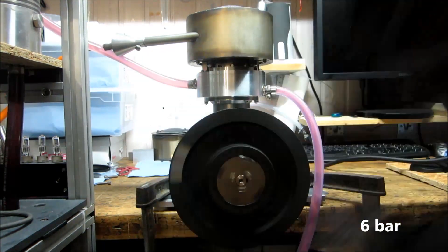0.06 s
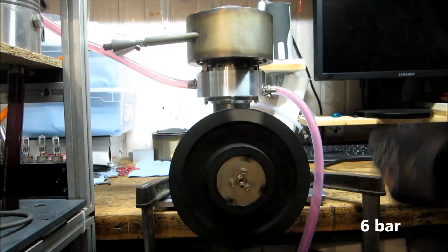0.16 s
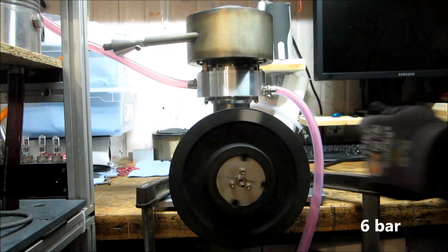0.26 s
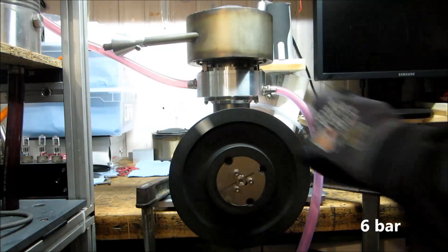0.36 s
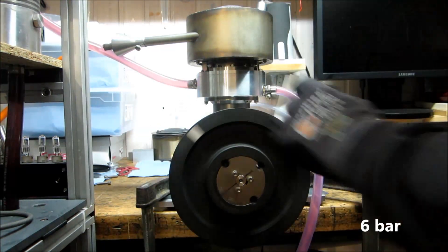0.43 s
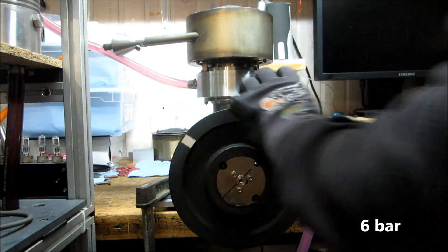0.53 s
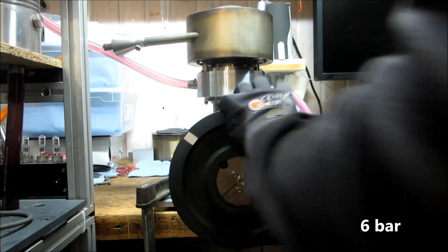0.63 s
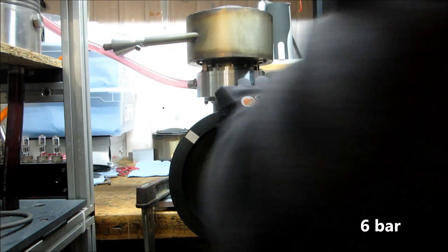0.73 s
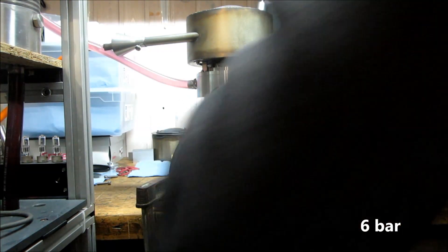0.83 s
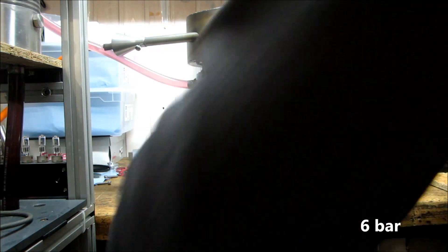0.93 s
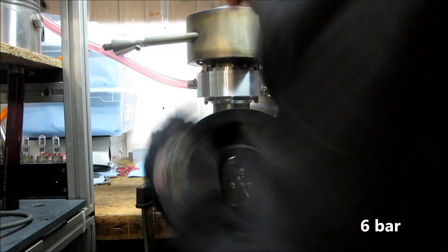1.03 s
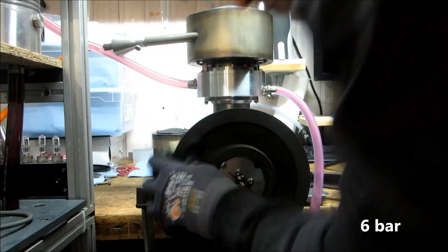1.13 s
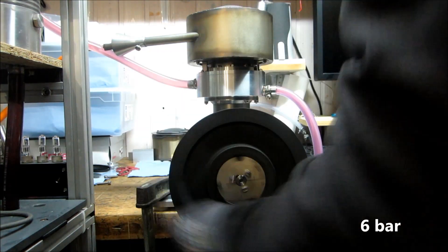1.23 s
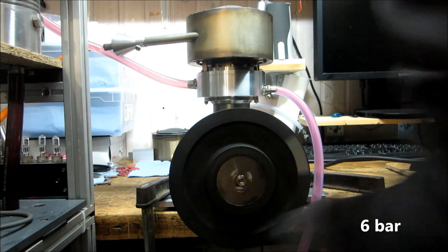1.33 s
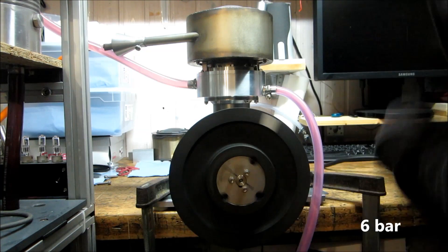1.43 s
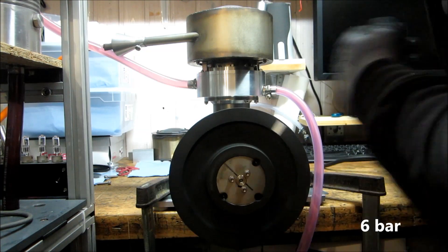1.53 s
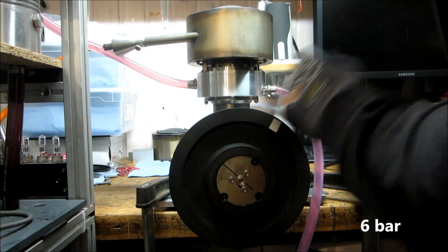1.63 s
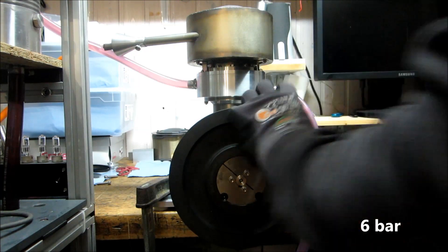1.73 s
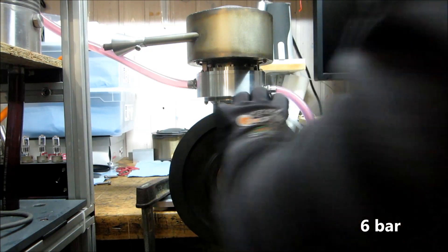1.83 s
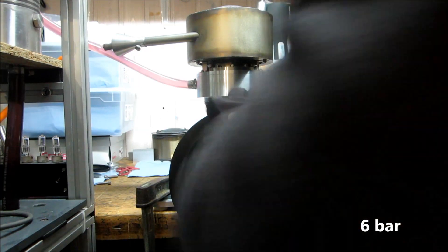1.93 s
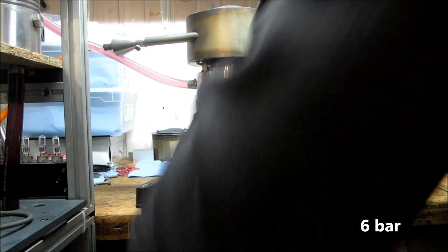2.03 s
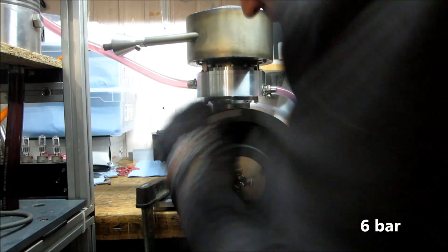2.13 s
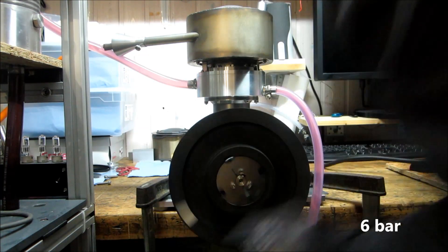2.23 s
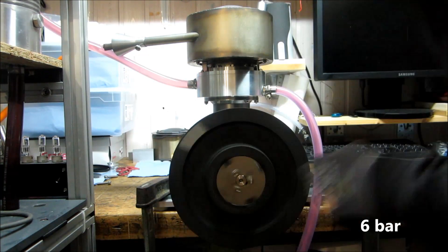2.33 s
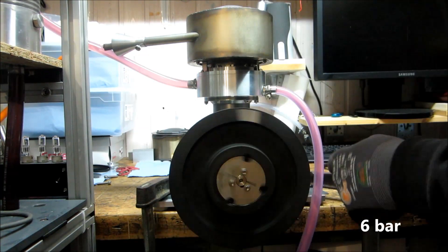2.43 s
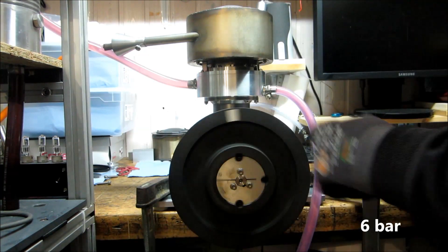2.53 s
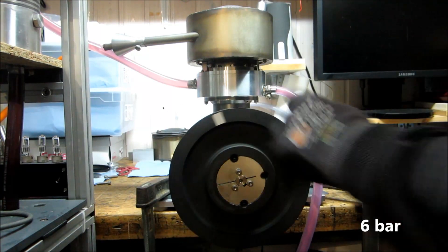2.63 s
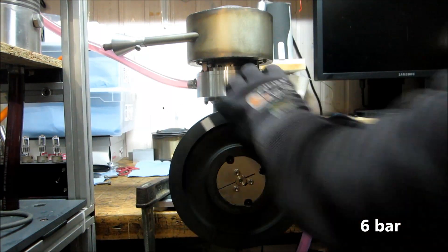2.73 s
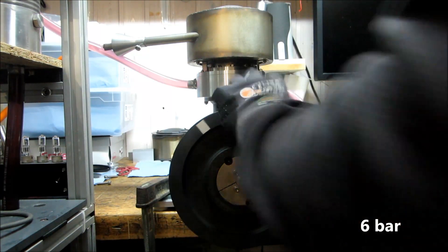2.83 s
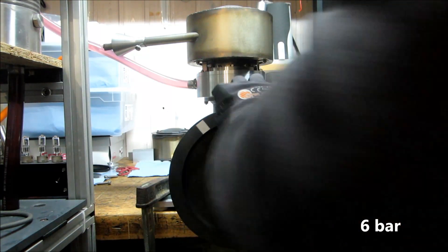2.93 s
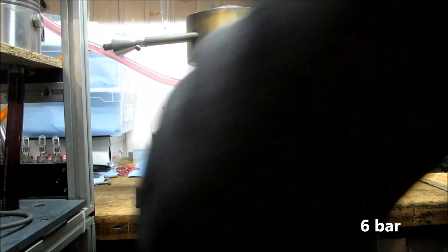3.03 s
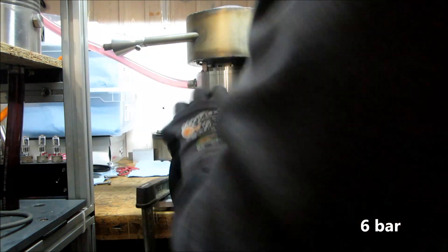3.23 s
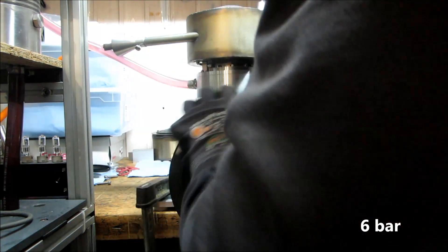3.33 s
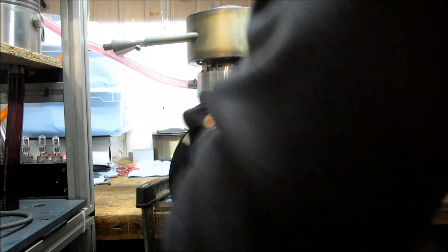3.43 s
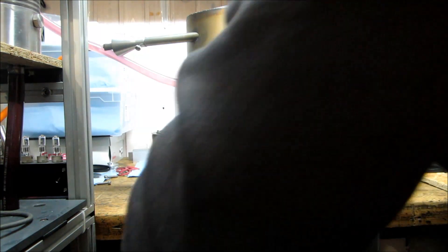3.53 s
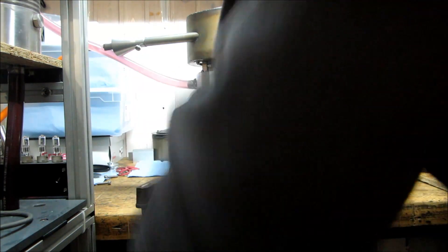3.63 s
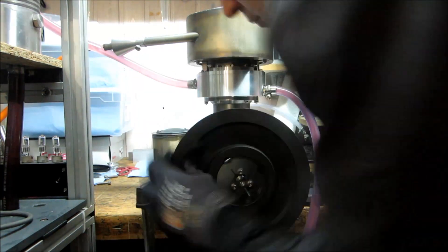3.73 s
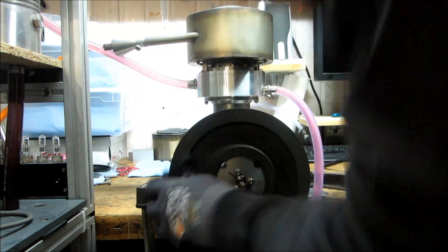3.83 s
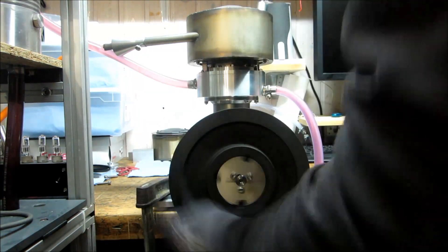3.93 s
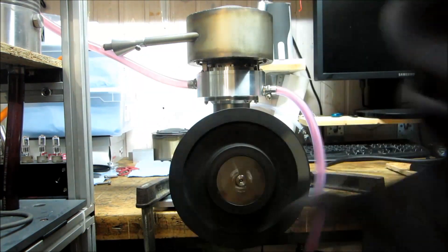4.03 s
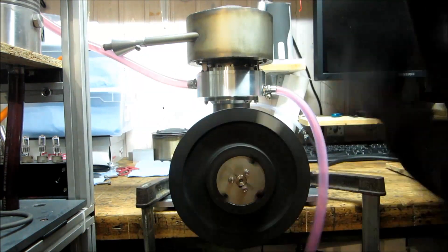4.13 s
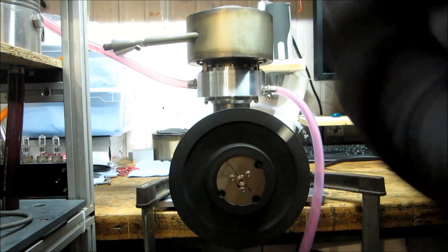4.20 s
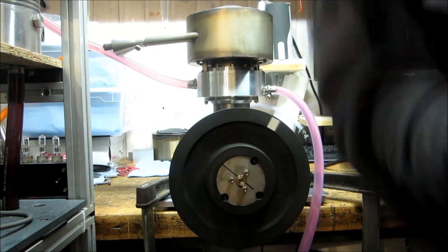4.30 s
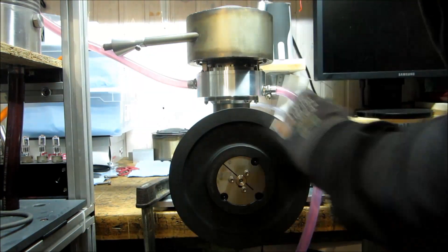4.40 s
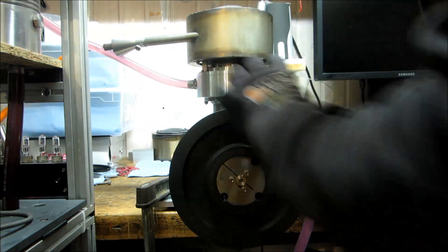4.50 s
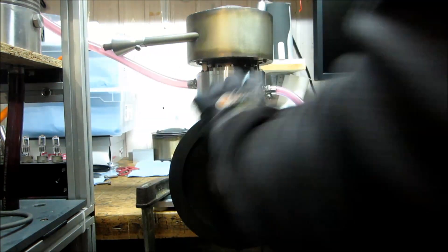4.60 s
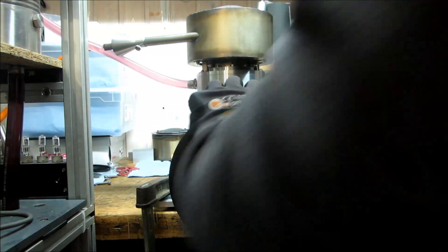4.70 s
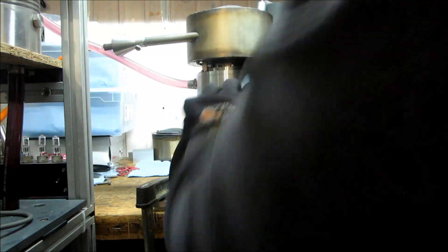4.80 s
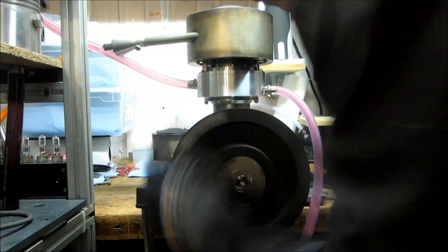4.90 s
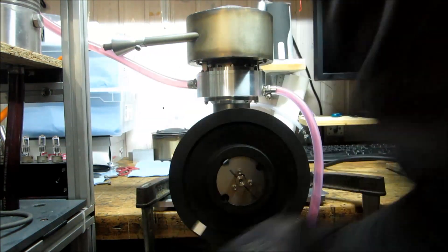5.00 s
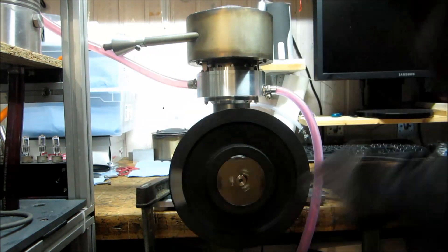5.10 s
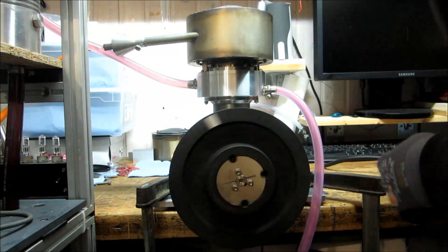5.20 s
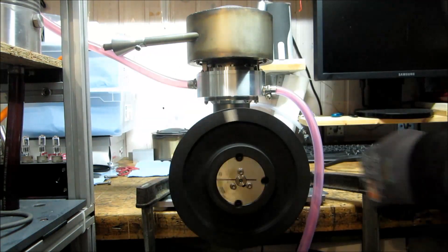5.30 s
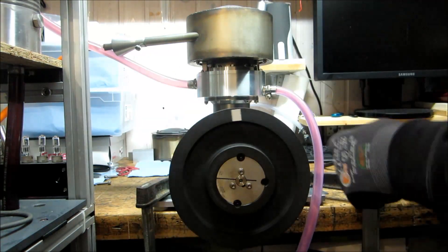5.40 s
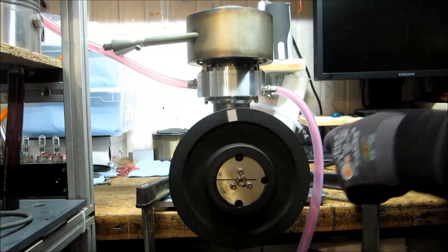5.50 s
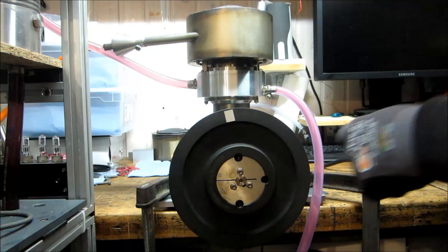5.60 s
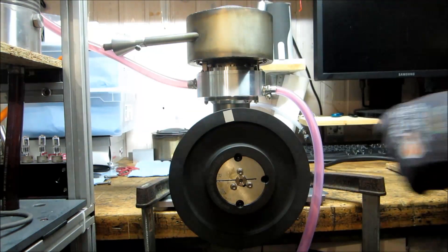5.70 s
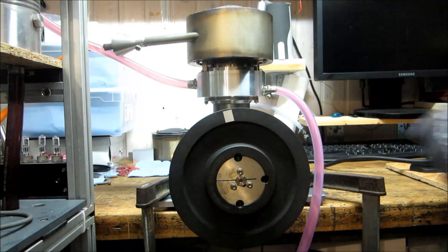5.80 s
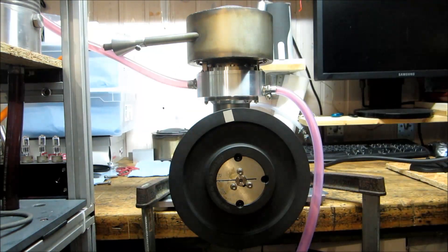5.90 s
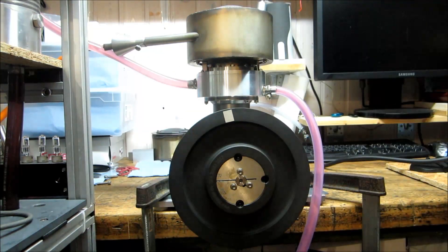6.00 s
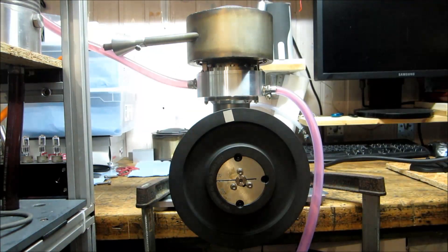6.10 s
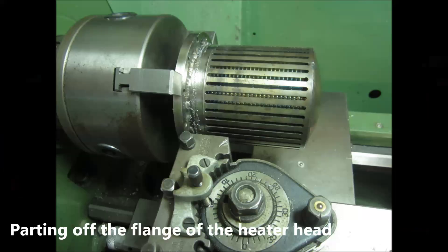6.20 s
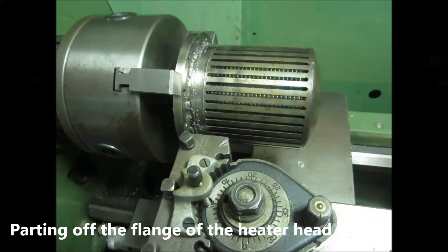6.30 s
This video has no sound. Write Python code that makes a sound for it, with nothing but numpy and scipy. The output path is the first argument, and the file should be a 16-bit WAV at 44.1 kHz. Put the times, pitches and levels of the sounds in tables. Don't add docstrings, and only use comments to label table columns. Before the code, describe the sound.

In a small, quiet workshop, a gloved hand repeatedly jerks the flywheel of a small engine on a wooden bench. Each pull brings uneven metallic clunks, linkage ticks, hollow wooden thumps and a brief rumbling whirr with leaking hiss. Between pulls come faint rubber squeaks and sleeve swishes. The knocking stops, quiet room tone remains, then it cuts to silence and a small click. Close single microphone, weak bass, short room echo.

```python
import sys
import numpy as np
from scipy import signal
from scipy.fft import rfft, irfft, next_fast_len
from scipy.io import wavfile
from scipy.ndimage import uniform_filter1d

SR = 44100
rng = np.random.default_rng(int(sys.argv[2]) if len(sys.argv) > 2 else 0)


def persist_wave(psi):
    counts = np.round(np.clip(psi, -1, 1) * 32767).astype(np.int16)
    wavfile.write(sys.argv[1], SR, np.atleast_2d(counts).T)


def undo_db(level):
    steps = np.asarray(level, float) / 20
    return 10 ** steps


N = 280015
T = np.arange(N) / SR
M = next_fast_len(N)
HZ = np.fft.rfftfreq(M, 1 / SR)

# t/s, force/dB, sharpness/dB, contact length/s
CLUNKS = [(0.0511, -31.5, -2, 0.0077), (0.138, -37, 4, 0.0078), (0.162, -37.5, 9, 0.0022),
          (0.202, -35.5, 0.5, 0.0054), (0.299, -47.5, -1, 0.0059), (1.084, -30, -6.5, 0.0065),
          (1.208, -53, 5.5, 0.0049), (1.326, -50.5, 11.5, 0.0084), (1.321, -48.5, -6, 0.005),
          (1.381, -47, 3.5, 0.0099), (1.397, -32, 5, 0.0049), (1.477, -40.5, 1.5, 0.007),
          (2.446, -43.5, -6, 0.0094), (3.754, -33.5, -5, 0.0073), (4.103, -31.5, 2, 0.0081),
          (4.182, -39.5, 1, 0.0034), (4.289, -45.5, -6, 0.0058), (4.985, -38, 7, 0.0087),
          (5.129, -46, -10, 0.011), (5.135, -42, 5, 0.01), (5.345, -51, -14, 0.006),
          (5.429, -54, -30, 0.0031), (4.758, -61.5, -17, 0.0048)]
# t/s, force/dB, sharpness/dB, contact length/s
SLAPS = [(0.016, -40, 0, 0.0066), (2.19, -44.5, -9, 0.0065), (2.21, -33.5, -2, 0.0057),
         (2.241, -26, -5.5, 0.0035), (2.327, -41.5, -4, 0.013), (2.353, -37.5, -2.5, 0.0085),
         (4.1335, -42, 24, 0.0016), (5.0178, -33.5, -2.5, 0.0072), (5.076, -46.5, 11.5, 0.0097),
         (5.151, -39.5, -2.5, 0.012), (2.162, -53, 2, 0.0074), (3.023, -65, 7, 0.014),
         (3.388, -60.5, 5, 0.0075), (4.966, -47, -9, 0.018)]
# t/s, force/dB, sharpness/dB, contact length/s
SCUFFS = [(0.108, -44.5, -4, 0.022), (1.007, -60.5, 4, 0.0056), (1.15, -50, -8, 0.012),
          (1.255, -53.5, -4, 0.015), (2.093, -56.5, -12, 0.011), (2.118, -55.5, -1, 0.012),
          (2.625, -49, -18, 0.002), (3.662, -61.5, -3.5, 0.012), (3.696, -51.5, 2, 0.013),
          (3.812, -50, -6, 0.011), (3.885, -53.5, -5, 0.016), (4.024, -62, -5, 0.033),
          (4.428, -67, 7, 0.0093), (4.875, -60, -12, 0.0059), (4.926, -55.5, -13, 0.0065),
          (4.938, -52, 4, 0.0092), (4.969, -51, -17, 0.0065), (3.173, -63.5, -7, 0.0048)]
# t/s, force/dB, sharpness/dB
TICKS = [(.002, -49, -20), (.080, -46.5, 20), (.296, -41, -2), (4.649, -59.5, 8), (1.258, -60, 22),
         (.196, -39.5, -16), (0.434, -49, -21), (0.869, -59.5, 30), (1.026, -48, 6), (1.345, -44.5, 15),
         (1.582, -46, -18), (2.2865, -38, 12), (2.296, -41.5, 22), (2.431, -41.5, -15), (2.545, -42, -7),
         (2.448, -44, -4), (2.984, -55.5, 14), (3.172, -56, -8), (3.696, -60.5, 18), (3.647, -51, -9),
         (4.183, -37.5, -7), (4.826, -58.5, -12)]
# share/dB, slope/(dB per dB of sharpness)
HEAVY_PATH = [(-0.5, 0), (-6, 0.23), (-4.5, 0.69), (-12.5, 1)]
PIN_PATH = [(-2, 0.22), (-2.5, 0), (-1.5, 0.37), (-10, 0.73)]
LIGHT_PATH = [(-9.5, -0.27), (-14.5, -0.065), (-0.5, -0.12), (-13, 0.43)]
# f/Hz, width/Hz, level/dB
FRAME = [(796, 140, -5), (873, 60, -5), (1010, 150, -3.5), (1192, 110, -1.5), (1308, 73, -2),
         (1343.6, 69, -1.5), (1491, 100, -7.5), (1692, 230, -10), (1875.6, 56.6, -1), (1889, 163, 0),
         (2190, 237, -5), (2328, 223, -5.5), (2723, 183, -10.5)]
# f/Hz, width/Hz, level/dB
LINKAGE = [(3120, 820, 0.5), (3570, 95, -4.5), (3780, 373, 2), (4030, 710, 3), (4660, 310, -6),
           (5270, 740, -8)]
# f/Hz, level/(dB per Hz)
EDGE = [(2350, -14), (4000, 5.5), (4940, -7), (6400, -1.5), (8800, -3), (11800, -7), (13200, -12.5),
        (15600, -18.5)]
# t/s, peak level/dB, f/Hz
CRACKS = [
    (.0585, -26, 2200),
    (4.1343, -21.5, 5500),
    (5.0245, -25, 2800),
    (2.2487, -28, 2200),
]
# t/s, level/dB, f/Hz
PINGS = [(0.058, -24, 1420), (0.137, -29, 1770), (0.205, -31, 1190), (0.297, -40, 1480), (0.435, -44, 3630),
         (1.085, -29, 1260), (1.4, -28, 1190), (1.482, -36, 1200), (1.586, -40, 1010), (2.165, -45.5, 1960),
         (2.211, -28.5, 1840), (2.244, -25, 2370), (2.333, -32, 1480), (2.355, -29, 1810),
         (2.432, -34, 980), (2.546, -38, 3160), (3.648, -51, 4480), (3.756, -27, 1186), (3.889, -46, 1930),
         (4.106, -23.5, 1187), (4.183, -33, 1190), (4.291, -40, 1190), (4.83, -55, 3810), (4.929, -44, 829),
         (4.986, -29.5, 1900), (5.022, -24, 1187), (5.132, -32, 1260), (5.157, -31, 1490),
         (5.348, -46, 1200)]
# t/s, level/dB, f/Hz
MORE_PINGS = [(0.32, -38, 4000), (.196, -36, 4100), (4.184, -31, 3900), (5.133, -34, 4000),
              (4.291, -40, 1190), (1.482, -33, 1190), (1.402, -27, 1190), (1.085, -29, 1270),
              (5.347, -47, 1900), (2.212, -32, 1840), (5.432, -51, 1490)]

# t/s, top board level/dB, small boards and clamps level/dB
THUMPS = [(.022, -36.5, -37.5), (0.063, -35, -50), (0.107, -43, -57), (.138, -59, -41),
          (.164, -43.5, -48.5), (0.205, -41, -52), (.302, -38.5, -40), (1.101, -43.5, -41),
          (1.327, -72, -47.5), (1.405, -32, -41), (1.495, -34, -39), (1.585, -43, -47), (2.096, -60, -46.5),
          (2.212, -32.5, -36.5), (2.245, -43, -39), (2.331, -41, -57), (2.359, -55, -41), (2.445, -41, -48),
          (2.548, -41.5, -42.5), (3.41, -57.5, -51), (3.665, -49, -51.5), (3.763, -44.5, -41),
          (4.108, -32, -39), (4.193, -34, -39), (4.296, -44.5, -48.5), (4.986, -31.5, -39),
          (5.024, -40.5, -40.5), (5.138, -43.5, -43), (5.162, -61, -41), (5.196, -42.5, -50)]
# t/s, level/dB
LURCHES = [
    (.162, -34.5),
    (2.36, -38),
    (2.387, -44.5),
    (3.94, -53.5),
    (5.158, -39),
    (5.195, -41),
]
# f/Hz, width/Hz, level/dB
BOARD = [(173, 24, 0), (200, 20, .3), (235, 35, -13)]
# f/Hz, width/Hz, level/dB
BENCH = [(270, 45, 0), (341.7, 45, 0.4), (385, 45, -8), (423, 30, -1), (471, 55, -3), (519, 28, -2),
         (551, 35, 0), (630, 80, -4), (726, 110, -5), (860, 150, -8)]
# f/Hz, width/Hz, level/dB
PLANKS = [(225, 50, -2), (285, 50, 0), (345, 50, 0), (423, 45, -2)]
# f/Hz, width/Hz, level/dB
LINGER = [(190.8, 4.4, -28), (194.5, 4.5, -30), (385.7, 2, -31.5), (423, 3.9, -30.5)]

# full speed t/s, held for/s, effort/dB, load on the bench/dB
SPINS = [
    (.02, 0.19, -53.5, 1.5),
    (1.08, 0.16, -62.5, -5.5),
    (1.38, 0.12, -57, -6.5),
    (2.245, 0.215, -60, 3.5),
    (2.62, 0.039, -87, -1),
    (3.42, 0.011, -86.5, 12),
    (3.72, 0.23, -61.5, -15),
    (4.12, 0.12, -59, -6),
    (4.98, 0.21, -63, 6),
]
GRIPS = [-.2, 1.02, 1.315, 2.09, 2.5, 3.385, 3.647, 4.022, 4.92]
FOLLOW = {"board": (0.15, -1, 146, 90.5, -77.5), "clamps": (-0.03, 2.5, 130, 73.5, -83),
          "planks": (0.13, 1.5, 122, 70, -81), "rumble": (0.0, -1, 150.5, 64, -81),
          "gas": (-0.045, -3.5, 203, 56.5, -81), "shelf": (0.11, -1, 147, 69, -84)}
# f/Hz, level/(dB per Hz)
HISS = [(880, -40), (1500, -11.5), (2140, -4.5), (2500, 1), (3490, -1), (6530, -6), (11600, -8.5),
        (15600, -18)]

# t/s, held for/s, rim level/dB, hub level/dB
RINGING = [
    (.12, .1, 3, 0),
    (.32, .09, 5, 6),
    (1.42, .17, 5, -1),
    (2.44, .04, 1, -6),
    (2.57, .08, 2, -4),
    (4.21, .1, 3, -5),
    (5.29, .02, 1, -14),
]
# f/Hz, level/dB
SING = [(2719, -12), (3467, -3), (3930, -9), (4533, 0), (5082, -9), (5518, -10), (6078, -4), (6923, -8),
        (8753, -6), (9259, -10), (7400, -11), (10700, -13), (14200, -16), (9970, -11), (11499, -10),
        (12075, -13), (12866, -15), (13474, -14), (15052, -16)]
# t/s, length/s, first f/Hz, last f/Hz, level/dB
SQUEAKS = [(1.51, .025, 14600, 15500, -82), (1.59, .035, 15600, 14300, -83), (1.62, .04, 14300, 14300, -83),
           (1.61, .06, 12000, 10500, -83), (1.72, .1, 12500, 11000, -90), (3.19, .07, 10700, 12800, -87),
           (3.25, .05, 11700, 11800, -84), (3.32, .05, 12000, 11750, -85), (3.4, .07, 11700, 11600, -86),
           (3.32, .045, 14650, 14500, -86), (3.255, .04, 14500, 14800, -89), (3.35, .04, 10400, 11300, -89),
           (3.5, .05, 14900, 14100, -93), (3.47, .08, 12200, 10800, -88), (3.56, .04, 12200, 11400, -86),
           (4.55, .03, 14200, 15500, -87), (4.6, .05, 10800, 12000, -86), (4.75, .05, 11700, 10900, -85),
           (4.79, .075, 10800, 12100, -88), (4.81, .045, 13400, 13900, -87),
           (5.23, .055, 14400, 14000, -87), (5.308, .07, 15600, 13700, -88), (5.352, .07, 11100, 9200, -90)]
# t/s, length/s, level/dB, centre f/Hz,
# width/octaves
SWISHES = [(0.48, 0.39, -75, 11500, 0.56), (0.548, 0.32, -71.5, 2340, 0.78), (0.05, .05, -56.5, 11000, .6),
           (0.318, .05, -66, 11800, 0.32), (1.143, .035, -68, 10000, .5),
           (2.245, 0.041, -56.5, 11000, 0.44), (3.813, 0.047, -66, 11000, .4),
           (3.88, 0.065, -68, 10000, .5), (4.26, 0.031, -74, 12500, .3), (4.17, 0.19, -65, 7500, 1.1),
           (2.56, 0.14, -70, 9500, 1), (2.46, .045, -66.5, 10500, 0.66), (1.5, 0.085, -67.5, 7000, 1),
           (5.16, 0.0496, -65, 10000, 0.67), (5.19, 0.081, -66.5, 6300, 1.3), (4.05, .07, -57.5, 2400, 1.1),
           (4.1, .05, -56.5, 12000, .4), (5.075, .03, -58, 13000, .35), (5.0, 0.071, -62, 12500, .4),
           (0.14, .012, -48, 8500, .1), (0.17, .012, -57, 8800, .15), (2.769, 0.0093, -70, 2400, 1.1),
           (2.118, .008, -65.5, 11500, .3), (1.64, .2, -72.5, 3400, 1.1), (3.9, 0.09, -70.5, 1300, .7),
           (1.1, 0.18, -64, 1360, .8), (2.877, .04, -72, 5000, 1.24), (4.08, 0.081, -52, 2000, 1.4),
           (4.61, 0.13, -70.5, 3100, 1.4), (5.565, 0.2, -62, 4900, 1.5), (5.845, 0.092, -71, 5960, 1.5),
           (6.026, 0.091, -65.5, 9100, 0.75)]

# t/s, held for/s, level/dB
LEANS = [(.2, 0.23, -62), (1.12, 0.039, -71.5), (1.5, 0.061, -59.5), (2.25, 0.091, -59), (2.5, 0.06, -61),
         (2.76, 0.21, -67.5), (3.36, 0.044, -74.5), (3.76, 0.067, -68.5), (4.23, 0.045, -65.5),
         (5.1, 0.17, -56.5), (5.6, 0.053, -74)]
# t/s, held for/s, level/dB
HUMS = [
    (1.68, 0.064, -68),
    (2.741, 0.11, -67.5),
    (3.95, 0.073, -73),
    (4.47, 0.071, -65),
    (5.399, 0.15, -72),
]
# f/Hz, width/Hz, level/dB
SWAY_MODES = [(72, 13, 0), (108, 45, 0)]
# f/Hz, width/Hz, level/dB
PANEL = (197, 8, 0)

# f/Hz, T60/s
ROOM_T60 = [(150, 0.36), (600, 0.3), (2500, 0.15), (10000, 0.17)]
# f/Hz, level/(dB per Hz)
AIR = [(12, -28.5), (20, 10.5), (208, -9), (384, -7.5), (689, -11), (1730, -16), (7790, -22.5),
       (15600, -28.5)]
OFFSET = [
    [-.0178],
    [.0178],
]


def evened(x):
    return x / np.sqrt(np.mean(x ** 2) + 1e-20)


def read(points, hz):
    f, value = np.transpose(points)
    return np.interp(np.log(hz + 1), np.log(f + 1), value)


def coloured(x, points):
    return irfft(rfft(x, M) * undo_db(read(points, HZ)), M)[:N]


def body(x, modes):
    narrowest = min(width for _, width, _ in modes)
    u = np.arange(int(3 * SR / narrowest)) / SR
    response = np.zeros(len(u))
    for k, (hz, width, db) in enumerate(modes):
        decay = np.sqrt(width) * np.exp(-np.pi * width * u)
        response += (-1) ** k * undo_db(db) * decay * np.sin(2 * np.pi * hz * u)
    return signal.oaconvolve(x, response / np.linalg.norm(response))[:N]


def slow_noise(hz):
    size = int(SR / hz)
    return evened(uniform_filter1d(uniform_filter1d(rng.standard_normal(N), size), size))


def flutter(hz, db):
    return undo_db(db * slow_noise(hz))


def steady(x, seconds):
    return x / np.sqrt(abs(uniform_filter1d(x ** 2, int(seconds * SR))) + 1e-9)


def swell(at, hold, peak_db, rise, fall, start=None):
    at, hold, peak_db = (np.asarray(v)[:, None] for v in (at, hold, peak_db))
    coarse = T[::64]
    slope = np.minimum(rise * (coarse - at), fall * (at + hold - coarse))
    db = peak_db + np.minimum(slope, 0)
    if start is not None:
        db = db + 3000 * np.minimum(coarse - np.array(start)[:, None], 0)
    return np.interp(T, coarse, np.sqrt((undo_db(db) ** 2).sum(0)))


def following(part, load=0):
    lag, share_db, rise, fall, rest_db = FOLLOW[part]
    at, hold, effort_db, load_db = np.transpose(SPINS)
    peak_db = effort_db + share_db + load * load_db
    return swell(at + lag, hold, peak_db, rise, fall, GRIPS) + undo_db(rest_db)


def knocks():
    tick_s = 0.0053
    rows = [(*row, HEAVY_PATH) for row in CLUNKS + SCUFFS]
    rows += [(*row, PIN_PATH) for row in SLAPS]
    rows += [(*row, tick_s, LIGHT_PATH) for row in TICKS]
    size = 3000
    drive = np.zeros((4, N + size))
    unevenness = undo_db(2.33 * rng.standard_normal((len(rows), size)) - 3.0)
    chatter = rng.standard_normal((len(rows), size)) * unevenness
    u = np.arange(size) / SR
    for (s, force_db, sharp_db, length, path), noise in zip(rows, chatter):
        length = np.clip(length, .001, .03)
        share_db, slope = np.transpose(path)
        light = (1 - np.exp(-u / 0.002)) * np.exp(-u / length)
        heavy = 2.14 * u / (0.55 * length) * np.exp(-u / (0.52 * length))
        shapes = np.array([heavy + 0.19 * light, heavy + 0.14 * light, light, light])
        gain = undo_db(force_db + share_db + slope * sharp_db)[:, None]
        first = round(s * SR)
        drive[:, first:first + size] += gain * noise * shapes
    casing, crank, tick, edge = drive[:, :N]
    edge_rms = np.sqrt(np.mean(undo_db(read(EDGE, HZ)) ** 2))
    out = undo_db(0.5) * body(casing, FRAME[:7])
    out += undo_db(4.5) * body(crank, FRAME[7:])
    out += undo_db(3.5) * body(tick, LINKAGE)
    return out + undo_db(5.5) * coloured(edge, EDGE) / edge_rms


def cracks():
    out = np.zeros(N)
    u = np.arange(-60, 60) / SR
    for s, db, hz in CRACKS:
        pulse = np.cos(2 * np.pi * hz * u) * np.exp(-.5 * (u * hz / .4) ** 2)
        out[round(s * SR) - 60:][:120] -= undo_db(db) * pulse
    return out


def pings():
    level_db, rise_s, q, twin = -6.5, 0.0017, 14.5, 1.07
    out = np.zeros(N + 3000)
    u = np.arange(3000) / SR
    for s, db, hz in PINGS + MORE_PINGS:
        pair = np.sin(2 * np.pi * hz * u) - .45 * np.sin(2 * np.pi * hz * twin * u)
        envelope = (1 - np.exp(-u / rise_s)) * np.exp(-np.pi * hz / q * u)
        out[round(s * SR):][:len(u)] += undo_db(db + level_db) * pair * envelope
    return out[:N]


def ring(modes, spread_db, rise, loose=0.034):
    u = np.arange(SR // 4) / SR
    hz, width, db = np.transpose(modes)[:, :, None]
    db = db + spread_db * rng.standard_normal(db.shape)
    hz = hz * (1 + loose * rng.standard_normal(hz.shape))
    sign = (-1.) ** np.arange(len(modes))[:, None]
    vibration = sign * undo_db(db) * np.exp(-np.pi * width * u) * np.sin(2 * np.pi * hz * u)
    x = vibration.sum(0) * (1 - np.exp(-u / rise))
    return x / abs(x).max()


def thumps():
    drag_board_db, drag_clamp_db = -3, -4
    nudges = [(s, db + drag_board_db, db + drag_clamp_db) for s, db, *_ in SCUFFS]
    out, blows = np.zeros(N + SR), np.zeros(N)
    for s, board_db, small_db in THUMPS + nudges:
        blow = undo_db(board_db - 0.5) * ring(BOARD, spread_db=1.5, rise=0.00163, loose=.008)
        blow += undo_db(small_db + 1.0) * ring(BENCH[2:], spread_db=2.5, rise=0.0056, loose=.015)
        out[round(s * SR):][:len(blow)] += blow
        blows[round(s * SR)] = undo_db(board_db) + undo_db(small_db)
    for s, db in LURCHES:
        out[round(s * SR):][:SR // 4] += undo_db(db + 4.0) * ring(PLANKS, spread_db=2.0, rise=0.0026)
    u = np.arange(SR) / SR
    hum = sum(undo_db(db) * np.exp(-np.pi * w * u) * np.sin(2 * np.pi * hz * u) for hz, w, db in LINGER)
    hum = hum * (1 - np.exp(-u / 0.033))
    return out[:N] + signal.oaconvolve(blows, hum)[:N]


def turning():
    board, wood, frame, gas = rng.standard_normal((4, N))
    board = flutter(hz=25, db=2.0) * steady(body(board, BOARD), seconds=0.061)
    clamps = steady(body(wood, BENCH[4:]), seconds=0.013)
    planks = flutter(hz=15, db=2.5) * steady(body(wood, BENCH[:4]), seconds=0.018)
    rumble = body(frame * flutter(hz=120.6, db=1.5), FRAME)
    gas = flutter(hz=146, db=2.0) * flutter(hz=39.6, db=0.5) * evened(coloured(gas, HISS))
    out = following("board", load=0.95) * undo_db(-3.0) * board
    out += following("clamps", load=0.69) * undo_db(-3.0) * clamps
    out += following("planks", load=0.96) * undo_db(-1.5) * planks
    out += following("rumble") * undo_db(-5.0) * rumble
    return out + following("gas") * undo_db(-2.5) * gas


def singing():
    rise, fall, hub_hz = 130, 110, 5000
    noise, wobble = rng.standard_normal(N), flutter(hz=14, db=1.5)
    at, hold, rim_db, hub_db = np.transpose(RINGING)
    rim, hub = swell(at, hold, rim_db, rise, fall), swell(at, hold, hub_db, rise, fall)
    out = np.zeros(N)
    for k, (hz, db) in enumerate(SING):
        part = hub if hz < hub_hz else rim
        out += undo_db(db) * part * np.roll(wobble, 9000 * k) * body(noise, [(hz, 65., 0)])
    return undo_db(-77.) * out


def squeaks():
    bow, kin_db, order = .025, -11, 9
    out = np.zeros(N)
    for start, length, first_hz, last_hz, db in SQUEAKS:
        u = np.linspace(0, 1, round(length * SR))
        pitch = first_hz + (last_hz - first_hz) * u + bow * first_hz * 4 * u * (1 - u)
        phase = 2 * np.pi * np.cumsum(pitch) / SR
        tone = sum(undo_db(kin_db * abs(k)) * np.sin(phase * (1 + k / order)) for k in range(-1, 3))
        out[round(start * SR):][:len(u)] += undo_db(db + 3) * np.sin(np.pi * u) ** .5 * tone
    return out * flutter(hz=60, db=2.5)


def swishes():
    size = 2 ** 14
    out = np.zeros(N + size)
    hz = np.fft.rfftfreq(size, 1 / SR)
    noise = rng.standard_normal(N + size) * np.resize(flutter(hz=197.5, db=1.5), N + size)
    for s, length, db, centre_hz, octaves in SWISHES:
        at = round(s * SR)
        distance = np.log2((hz + 1) / centre_hz) / octaves
        shape = np.exp(-.5 * distance ** 2) / (1 + (hz / 11500.0) ** 4)
        hump = evened(irfft(rfft(noise[at:at + size]) * shape, size))
        arch = np.sin(np.pi * np.clip(T[:size] / length, 0, 1))
        out[at:at + size] += undo_db(db) * hump * arch ** (0.92 + 2.0 * length)
    return out[:N]


def wavering(hz, width, db):
    pitch = hz + .3 * width * slow_noise(width)
    return undo_db(db + 3) * flutter(hz=20, db=2.5) * np.sin(2 * np.pi * np.cumsum(pitch) / SR)


def sway():
    legs, shelf, panel = [wavering(*mode) for mode in SWAY_MODES + [PANEL]]
    leaning = swell(*np.transpose(LEANS), rise=110, fall=110) + undo_db(-85.5)
    humming = swell(*np.transpose(HUMS), rise=80, fall=51)
    return leaning * legs + following("shelf", load=0.58) * shelf + humming * panel


def room(x):
    turn_s = 0.2302
    hz, t, z = signal.stft(rng.standard_normal((3, SR // 2)), SR, nperseg=512)
    decay = undo_db(-60 * t / read(ROOM_T60, hz)[:, None])
    tails = signal.istft(z * decay, SR, nperseg=512)[1]
    tails[:, :300] = 0
    tails = tails / np.linalg.norm(tails[0])
    turn = np.sqrt(2 / 3) * np.cos(np.pi * (T / turn_s + np.arange(3)[:, None]) / 3)
    return signal.oaconvolve(x * turn, tails, axes=1).sum(0)[:N]


def workshop_air():
    return undo_db(-68.5) * evened(coloured(rng.standard_normal(N), AIR))


def whine():
    return undo_db(-88.5) * np.sin(2 * np.pi * 7854 * T)


def scene():
    engine = knocks() + cracks() + pings()
    bench = thumps()
    mono = engine + bench + turning() + singing() + squeaks() + swishes() + sway()
    mono += undo_db(-5.0) * room(engine + 0.77 * bench)
    mono += workshop_air() + whine()
    return np.array([mono, mono])


def top_cut(x):
    return signal.sosfilt(signal.butter(12, 15780, fs=SR, output="sos"), x)


def record(dry):
    cut_s, next_s = 6.2085, 6.3415
    hum_spectrum = [(20, 9.5), (500, 1.5), (3000, -5.5), (16000, -13)]  # f/Hz, level/(dB per Hz)
    hum = undo_db(-60.5) * evened(coloured(rng.standard_normal(N), hum_spectrum)) + 0.003
    dry = signal.lfilter(*signal.butter(2, 50., "high", fs=SR), dry)
    lowpass = signal.firwin(301, 15600, window=("kaiser", 8), fs=SR)
    dry = signal.oaconvolve(dry, lowpass[None], "same")
    mix = dry * (T < cut_s) + (hum + np.array(OFFSET)) * (T >= next_s)
    return top_cut(mix)


dry = scene()
out = record(dry)
persist_wave(out)
```